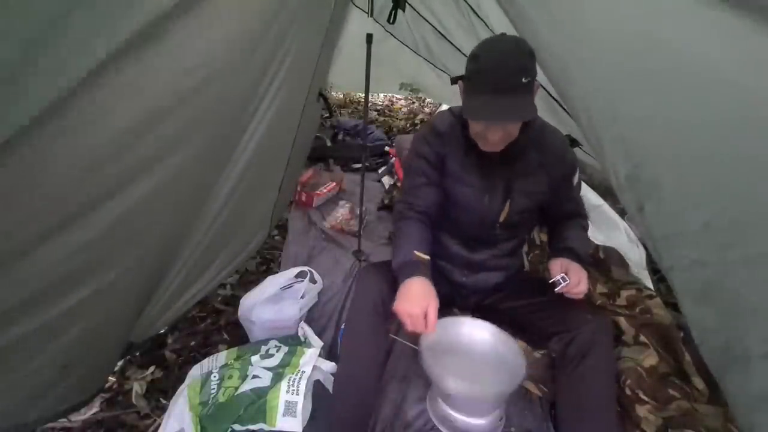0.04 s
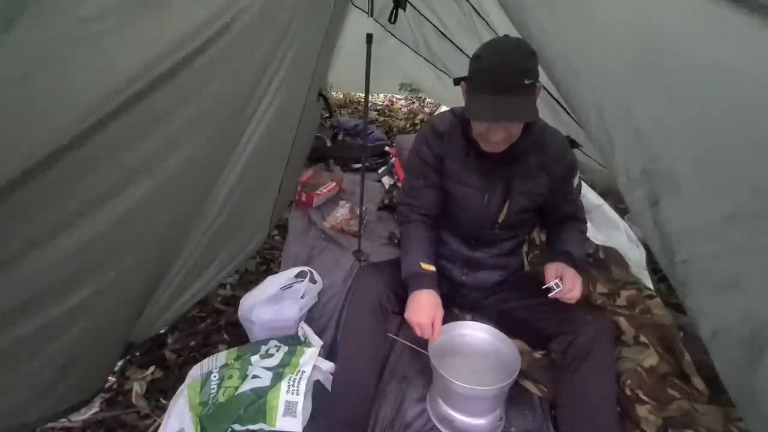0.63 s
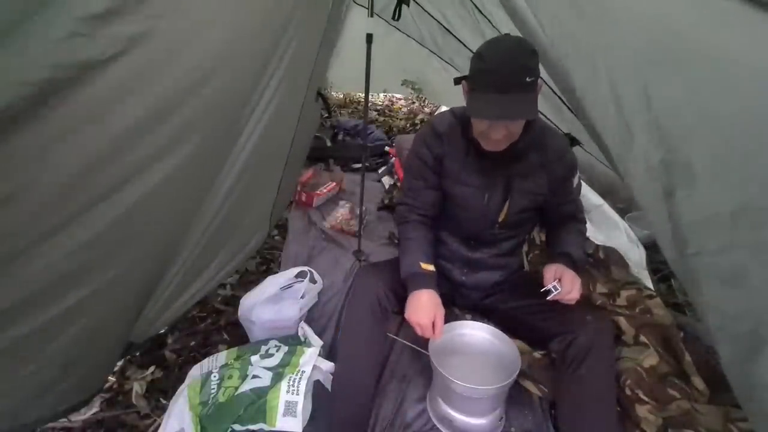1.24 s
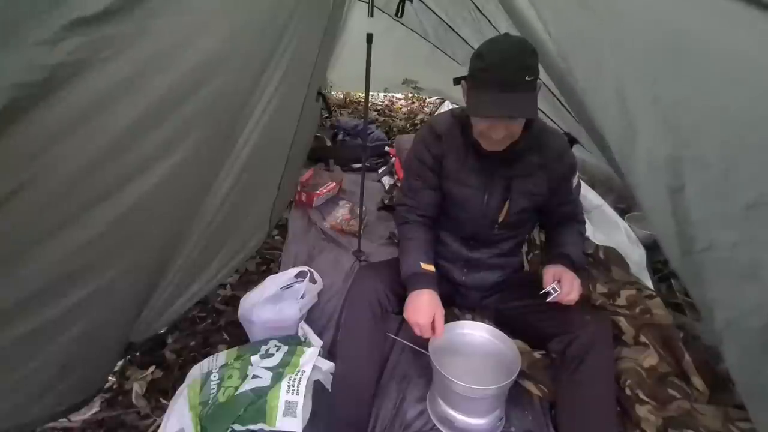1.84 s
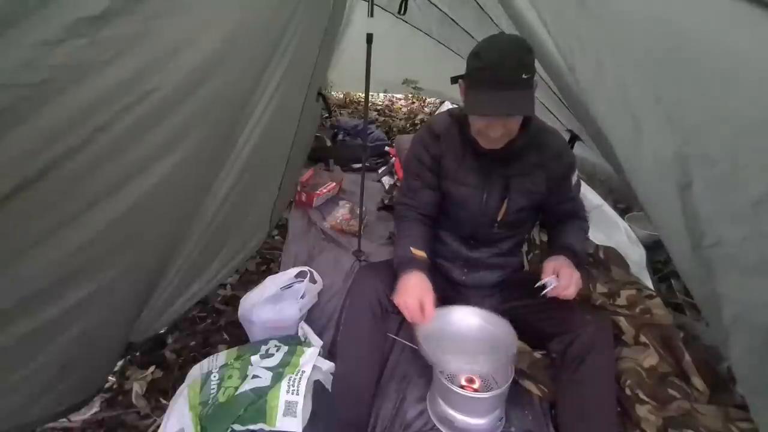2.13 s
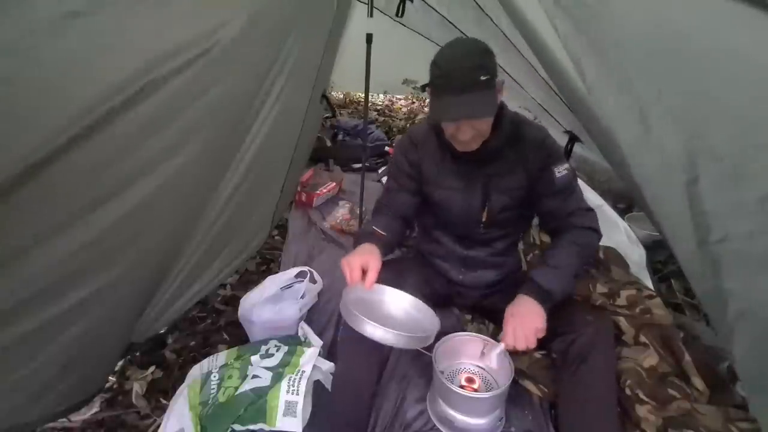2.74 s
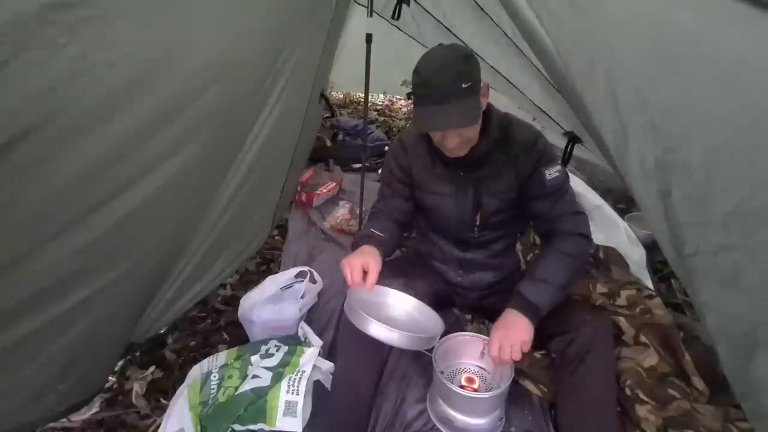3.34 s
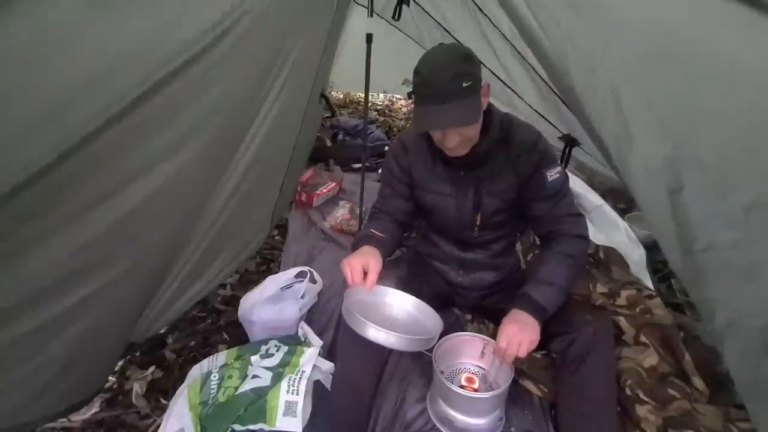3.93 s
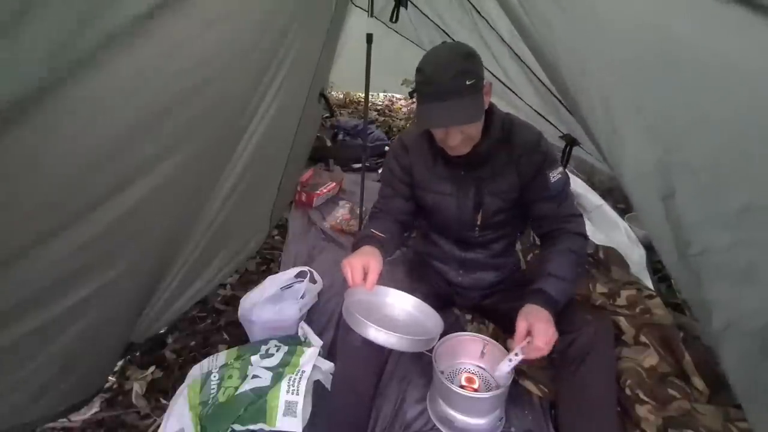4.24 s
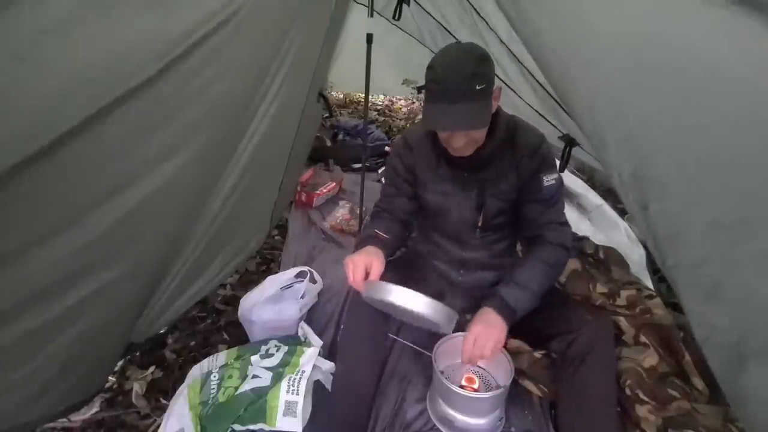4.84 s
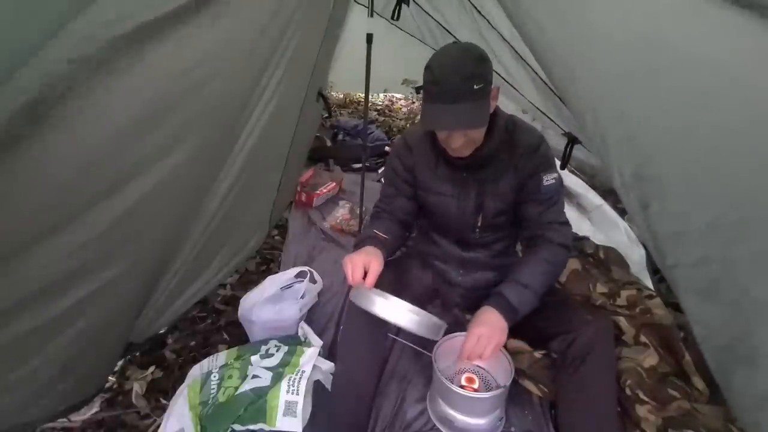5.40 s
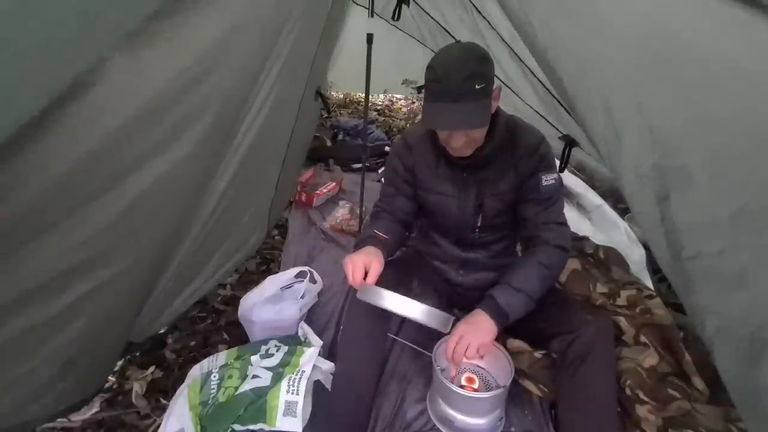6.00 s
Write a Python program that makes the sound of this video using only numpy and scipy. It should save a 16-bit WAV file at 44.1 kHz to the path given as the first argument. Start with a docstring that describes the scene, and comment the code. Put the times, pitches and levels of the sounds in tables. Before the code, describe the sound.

Distant traffic rumbles with a low engine drone, then slowly draws away. Close by, an aluminium pan clanks onto a camping stove, rocks and settles, and is lifted off with a faint knock. A metal pot gripper gives a sharp, high ping, then taps, scrapes and clacks inside the stove. Faint scrapes of the burner follow. A nylon jacket barely rustles inside the tent.

```python
"""Aluminium cookware is handled on a camping stove inside a tarp tent.
From the start a distant road rumbles, one heavy engine drones and a jacket rustles. At 0.5 s a pan
clanks onto the stove's windshield; at 2 s it is lifted off, while the traffic draws away. At 2.6 s a
metal pot gripper pings, then taps and scrapes in the stove. From 4.7 s fingers also turn the burner.
Each touch makes the metal ring at its own set of pitches, called modes."""
import sys
import numpy as np
from scipy import signal
from scipy.fft import rfft, irfft, next_fast_len
from scipy.io import wavfile

SR = 44100
rng = np.random.default_rng(int(sys.argv[2]) if len(sys.argv) > 2 else 0)


def unload_wav(signal):
    """Save mono or channel-first audio to the path in sys.argv[1] as 16-bit WAV at rate SR, clipped to [-1, 1]."""
    wavfile.write(
        sys.argv[1],
        SR,
        np.round(np.clip(np.atleast_2d(signal).T, -1, 1) * 32767).astype(np.int16),
    )


N = 271656
TIME = np.arange(N) / SR

# the crowd of weak modes in the stove and its burner, as a noise spectrum: f/Hz, level/dB
STOVE_CROWD = [(600, -21), (1300, -13.5), (1800, -9.5), (2900, -3), (4400, -2), (6200, -2.5), (7500, -8),
               (8800, -5), (12000, -3), (13600, -8.5), (15000, 1.5)]


def from_db(db):
    """Turn decibels into a gain."""
    return 10 ** (np.asarray(db) / 20)


def rms_one(x):
    """Scale a sound so that its average power is 1."""
    return x / np.sqrt(np.mean(x ** 2) + 1e-20)


def at_hz(points, hz):
    """Read between the rows of a table, with the octaves evenly spaced."""
    known_hz, values = np.transpose(points)
    return np.interp(np.log(hz + 1e-3), np.log(known_hz), values)


def balance(balance_db):
    """Left and right gains; below 0 dB the right side is louder."""
    return from_db([[balance_db / 2], [-balance_db / 2]])


def stereo_noise(spectrum, size=N, right_lag_s=0.0004747):
    """Shaped noise at two microphones: alike in the bass, the right one slightly late."""
    # how alike the two sides are: f/Hz, likeness (1 = the same)
    likeness = [(60, .999), (160, 1), (300, 0.98), (700, 0.65), (1200, 0.83), (2200, 0.13), (5000, 0.033),
                (12000, 0.29)]
    hz = np.fft.rfftfreq(size, 1 / SR)
    common, apart = rfft(rng.standard_normal((2, size)))
    alike = np.clip(at_hz(likeness, hz), 0, 1)
    pair = np.sqrt(1 + alike) * common + np.sqrt(1 - alike) * apart * [[1], [-1]]
    pair[1] *= np.exp(-2j * np.pi * hz * right_lag_s)
    return rms_one(irfft(pair * from_db(at_hz(spectrum, hz)), size))


def brighten(x, tilt_db):
    """Make a sound brighter (+) or duller (-) by tilt_db per octave, keeping its energy."""
    size = next_fast_len(x.shape[1], real=True)
    octaves = np.log2(np.hypot(np.fft.rfftfreq(size, 1 / SR), 400) / 1000)
    tilted = irfft(rfft(x, size) * from_db(tilt_db * octaves), size)
    return rms_one(tilted[:, :x.shape[1]]) * x.std()


def ring(modes, crowd, crowd_db, crowd_t60, swell_s, crack, vary_db=1.2, detune=0.0, size=8192):
    """Touched metal rings with clear modes and a noisy crowd of others; t60 is the time to fade 60 dB."""
    t = np.arange(size) / SR
    hz, level_db, t60 = np.transpose(modes)[:, :, None]
    strength = from_db(level_db + vary_db * rng.standard_normal(hz.shape))   # depends on the spot hit
    hz = hz * (1 + detune * rng.standard_normal(hz.shape))   # a pressing hand shifts the modes
    left_phase = rng.uniform(0, 2 * np.pi, hz.shape)
    right_phase = left_phase + np.pi / 2 * rng.choice([-1, 1], hz.shape)
    tones = np.sin(2 * np.pi * hz * t + np.array([left_phase, right_phase]))
    clear = (strength * from_db(-60 * t / t60) * tones).sum(axis=1)
    clear /= np.sqrt(np.sum(strength ** 2) / 2)
    clear *= 1 - np.exp(-t / swell_s)   # the ring builds up as it spreads through the metal
    dense = stereo_noise(crowd, size=size) * from_db(-60 * t / crowd_t60)
    dense *= 1 + crack * np.exp(-t / 0.0011)   # the contact itself cracks briefly
    return clear + from_db(crowd_db) * dense


def contact(slide_s, slips_per_s=900):
    """The force of a touch: one click, then uneven slips for as long as the metal slides."""
    size = 1 + int(slide_s * SR)
    chance, strength = rng.random((2, SR // 10))[:, :size]
    force = (chance < slips_per_s / SR) * (2 * strength - 1)
    force[0] = 1
    return force / np.sqrt(np.sum(force ** 2))


def strike(touches, modes, crowd, bright_db, balance_db, hardening=0.0, **ring_settings):
    """Each touch sets off a fresh ring; with hardening, stronger touches sound brighter."""
    light_touch_db = -47   # hardening starts above this level
    out = np.zeros((2, N + SR))
    lead = SR // 100
    for time_s, level_db, slide_s in touches:
        response = ring(modes, crowd, **ring_settings)
        sound = signal.fftconvolve(response, contact(slide_s)[None], axes=1)
        tilt_db = bright_db + hardening * max(level_db - light_touch_db, 0)
        sound = brighten(np.pad(sound, ((0, 0), (lead, 0))), tilt_db)
        start = round(time_s * SR) - lead
        out[:, start:start + sound.shape[1]] += from_db(level_db) * sound
    return balance(balance_db) * out[:, :N]


def road(recede_middle_s=2.11, recede_half_s=0.97):
    """Far traffic rumbles and its tyres roar, growing quieter and duller as it draws away."""
    # the deep rumble of traffic: f/Hz, level/dB
    rumble_spectrum = [(18, -33), (27, -18), (37, 1), (46, 2.5), (62, 3), (100, 1), (140, -6.5), (175, 0),
                       (205, -4), (245, -2.5), (320, -13.5), (500, -52)]
    # the roar of tyres: f/Hz, level/dB
    tyre_spectrum = [(200, -1.5), (350, -1.5), (520, 1.5), (700, -2.5), (1130, 5.5), (1500, -7),
                     (2000, -13.5), (3000, -18.5), (5000, -31.5), (7000, -55.5)]
    gone = (1 + np.tanh((TIME - recede_middle_s) / recede_half_s)) / 2   # 0 = near, 1 = far
    rumble = from_db(-40 - 5 * gone) * stereo_noise(rumble_spectrum)
    roar = stereo_noise(tyre_spectrum)
    roar = (1 - gone) * roar + gone * brighten(roar, tilt_db=-1.5)
    return rumble + from_db(-40 - 6 * gone) * roar * balance(-0.8)


def engine(cycle_hz=19.2, waver=0.0258, fade_db=4.0):
    """Only a heavy engine's low tones carry this far; their pitch and strength waver on the way."""
    # tones that swell in turn: multiple of the cycle rate, peak level/dB, peak t/s, half-length/s
    swells = [(3, -48.5, 1.5, 2.3), (4, -48, 0.23, 0.6), (5, -44.5, 1.86, 0.63)]
    knots = np.linspace(0, TIME[-1], 60)
    out = np.zeros(N)
    for multiple, peak_db, loudest_s, half_s in swells:
        wander, fade = (np.interp(TIME, knots, row) for row in rng.standard_normal((2, len(knots))))
        phase = 2 * np.pi * multiple * np.cumsum(cycle_hz * (1 + waver * wander)) / SR
        swell = 1 / np.hypot(1, np.square((TIME - loudest_s) / half_s))
        out += from_db(peak_db + fade_db * fade) * swell * np.sqrt(2) * np.sin(phase)
    return out


def jacket():
    """Nylon sleeves brush softly; each move of an arm swells and dies away."""
    # arm moves: middle t/s, half-length/s, peak level/dB
    arm_moves = [(.15, 0.29, -63.5), (2.205, 0.16, -63.5), (2.796, 0.37, -63.5), (4.158, 0.48, -62),
                 (4.827, 0.075, -64), (5.5, 0.91, -68)]
    # the swish of nylon: f/Hz, level/dB
    nylon_spectrum = [(1000, -15.5), (3400, 1.5), (5300, 1), (6500, -10), (7800, -13), (9000, 0),
                      (10400, -12.5), (11200, 2.5), (12500, -7.5), (15000, -11.5)]
    power = sum(from_db(peak_db) ** 2 * np.exp(-np.square((TIME - middle_s) / half_s))
                for middle_s, half_s, peak_db in arm_moves)
    return np.sqrt(power) * stereo_noise(nylon_spectrum) * balance(-7)


def burner():
    """Fingers turn the small burner, which scrapes faintly in its seat."""
    # small turns: t/s, level/dB, sliding time/s
    turns = [(4.745, -63, 0.013), (5.028, -58.5, .03), (5.877, -51, 0.028), (5.922, -49, 0.017)]
    # the burner's modes: f/Hz, level/dB, t60/s
    modes = [(2800, -11, 0.086), (3040, -3, 0.11), (3346, -1, 0.086), (3547, 5, 0.11)]
    return strike(turns, modes, STOVE_CROWD, bright_db=-7.0, balance_db=-4.5,
                  crowd_db=8, crowd_t60=0.11, swell_s=0.00041, crack=0.25, detune=0.0236)


def frying_pan():
    """The wide pan lands, rocks, settles and is lifted; it rings, and the hollow stove under it knocks."""
    # pan meets windshield: t/s, ring level/dB, knock level/dB, sliding time/s
    touches = [(.5362, -25.5, -29, .0005), (.5385, -30, -38, .001), (.6203, -37, -30.5, 0.0053),
               (.698, -47.5, -42.5, 0.019), (2.04, -51.5, -43.5, 0.018)]
    # the pan's clear modes: f/Hz, level/dB, t60/s
    pan_modes = [(1023, -4, .22), (1464, -3, .22), (1879, -9, .25), (2336, -3.5, .29), (2600, -5, .09),
                 (2862, -3, .24), (3036, -8, .15), (3440, -2, .32), (3575, -4, .2), (4070, -12, .17),
                 (4247, -13, .18), (4737, -14, .18), (5448, -13, .16), (5792, -5, .13), (5970, -7, .14),
                 (8533, -11, .1), (10350, -10, .12), (11540, -6, .12), (13640, -8, .11), (14720, -8, .11)]
    # the crowd of weak modes between them: f/Hz, level/dB
    pan_crowd = [(120, 12), (260, -22), (400, -3), (650, 14), (1000, -29), (1900, -3), (3400, -6),
                 (5500, -9), (7000, -13.5), (10000, -11.5), (15000, -12)]
    # the hollow stove's low modes: f/Hz, level/dB, t60/s
    knock_modes = [(222, -7, .2), (253, -.5, .24), (278, 2, .22), (596, 2, .07), (666, -1, .11),
                   (748, 0, .2)]
    # the noisy part of its knock: f/Hz, level/dB
    knock_crowd = [(90, -28), (260, 12), (400, -17), (650, 6), (950, 16), (1400, 5.5), (2200, -13.5)]
    rings = [(time_s, ring_db, slide_s) for time_s, ring_db, _, slide_s in touches]
    knocks = [(time_s, knock_db, slide_s) for time_s, _, knock_db, slide_s in touches]
    ringing = strike(rings, pan_modes, pan_crowd, bright_db=-0.2, balance_db=-1.5,
                     crowd_db=2, crowd_t60=0.13, swell_s=0.0019, crack=1.3, size=16384)
    knocking = strike(knocks, knock_modes, knock_crowd, bright_db=-3.0, balance_db=-1.5,
                      crowd_db=-2.5, crowd_t60=0.31, swell_s=0.00028, crack=1.8)
    return ringing + knocking


def fumbles(start_s=3.95, end_s=4.18, gap_s=0.05, level_db=-60.5, spread_db=2.5, slide_s=0.014):
    """List the faint, uneven touches of the gripper as it feels for a hold."""
    return [(time_s + gap_s * rng.uniform(-0.54, 0.46),
             level_db + spread_db * rng.standard_normal(), slide_s)
            for time_s in np.arange(start_s, end_s, gap_s)]


def gripper_in_stove(graze_lead_s=0.0046, graze_db=-19):
    """The gripper clacks and scrapes in the stove; a hand on the stove keeps the ring short."""
    # the stove's modes: f/Hz, level/dB, t60/s
    modes = [(1820, -6.5, .07), (2600, -6, .07), (3540, -1, .065), (4560, -1, .07), (5561, -8, .06),
             (6300, -4.5, .06), (8550, 0, .06), (9372, -3, .055), (9862, -4, .055), (11479, -1, .055),
             (12371, -1, .055), (14200, -3, .05), (14960, 0, .055)]
    # hard clacks: t/s, level/dB
    clacks = [(2.7479, -30.5), (4.3413, -12.5), (4.475, -21.5)]
    # scrapes and ticks: t/s, level/dB, sliding time/s
    scrapes = [(2.741, -38, .002), (2.757, -41.5, .035), (3.0935, -60, .001), (3.753, -33, .003),
               (3.763, -35, .009), (3.784, -40.5, .004), (3.835, -46.5, .03), (3.873, -36.5, 0.0098),
               (3.907, -38.5, .001), (4.228, -48.5, .016), (4.277, -47.5, .018), (4.523, -47.5, .02),
               (5.7765, -58.5, .003), (5.9835, -45.5, .001)]
    hits = [(time_s, level_db, 0) for time_s, level_db in clacks]
    # the jaw grazes the metal just before each clack
    grazes = [(time_s - graze_lead_s, level_db + graze_db, 0) for time_s, level_db in clacks]
    clacking = strike(hits + grazes, modes, STOVE_CROWD, bright_db=-5.5, balance_db=-5.0, hardening=0.33,
                      crowd_db=1.5, crowd_t60=0.088, swell_s=0.00077, crack=0.63, detune=0.006)
    slides = list(scrapes) + fumbles()
    scraping = strike(slides, modes, STOVE_CROWD, bright_db=-5.5, balance_db=-4.5, hardening=0.31,
                      crowd_db=5.5, crowd_t60=0.093, swell_s=0.0006, crack=0.2, detune=0.013)
    return clacking + scraping


def gripper_ping():
    """The small gripper is struck, rings freely with a high ping and ticks once more."""
    # the hit and the tick: t/s, level/dB, sliding time/s
    touches = [(2.5636, -7, 0), (2.638, -43, .003)]
    # the gripper's clear modes: f/Hz, level/dB, t60/s
    modes = [(2972, -13, .08), (3671, -12.5, .085), (4226, -20, .09), (4859, -10.5, .085), (6218, -16, .07),
             (7967, -12, .09), (9851, -3.5, .068), (11116, -9, .07), (11194, 0, .075), (11236, -1, .07),
             (11313, -10, .07), (14383, -14, .08), (14759, -4, .075), (15120, -6, .07)]
    # the crowd of weak modes between them: f/Hz, level/dB
    crowd = [(1500, -32.5), (2500, -36.5), (2950, 3), (3350, -7), (4200, -3), (5600, -5), (7000, -11.5),
             (7900, 2), (9000, -4.5), (11400, 3), (12500, 1), (15000, -6.5)]
    return strike(touches, modes, crowd, bright_db=1.0, balance_db=-1.5,
                  crowd_db=-8.5, crowd_t60=0.09, swell_s=0.004, crack=0.2, vary_db=0.5)


def scene():
    """The road far off, clothing and cookware close by."""
    return road() + engine() + jacket() + frying_pan() + gripper_ping() + burner() + gripper_in_stove()


def record(dry, cutoff_hz=15450):
    """The microphones add a faint hiss, more on the right; the highest treble is cut."""
    # microphone hiss: f/Hz, level/dB
    hiss_spectrum = [(2000, -15.5), (3500, 16), (5300, 8.5), (6300, -5.5), (7800, -21.5), (9000, 2.5),
                     (11300, 7.5), (13000, -4.5), (15000, 7)]
    hiss = from_db(-66.0) * stereo_noise(hiss_spectrum) * balance(-7)
    low_pass = signal.ellip(12, 0.2, 75, cutoff_hz, fs=SR, output="sos")
    return signal.sosfilt(low_pass, dry + hiss)


dry = scene()
out = record(dry)
unload_wav(out)
```